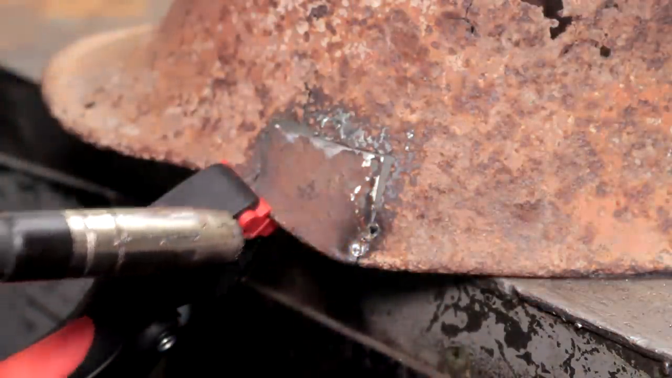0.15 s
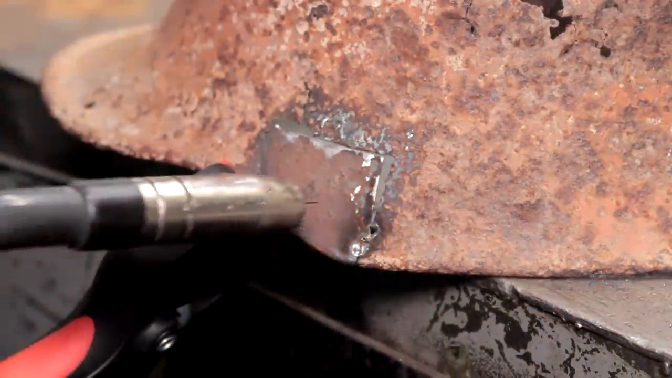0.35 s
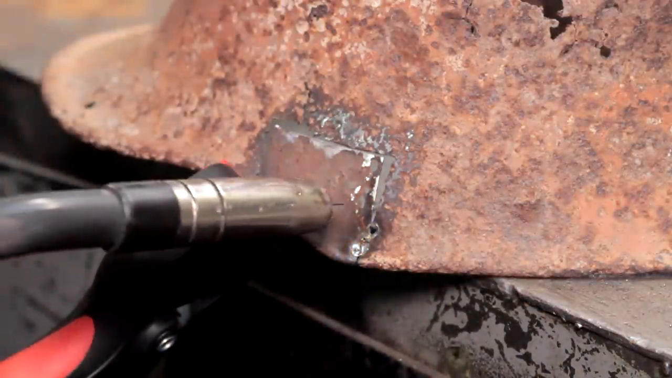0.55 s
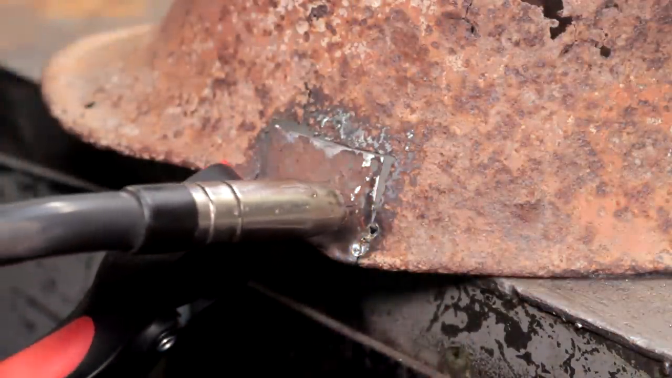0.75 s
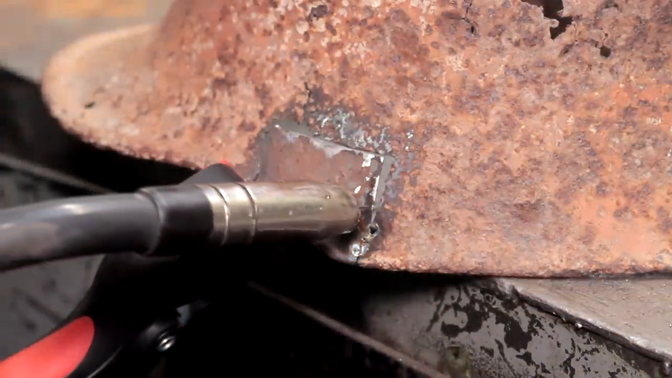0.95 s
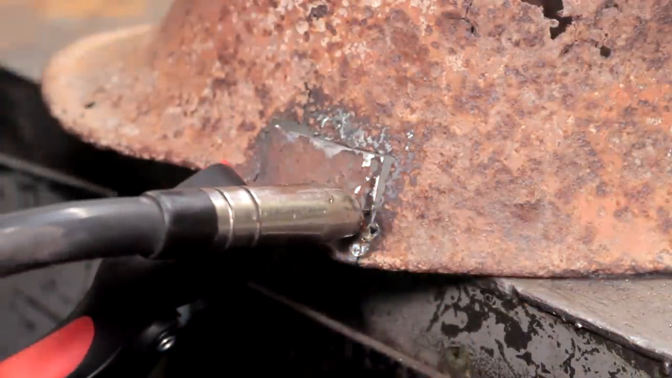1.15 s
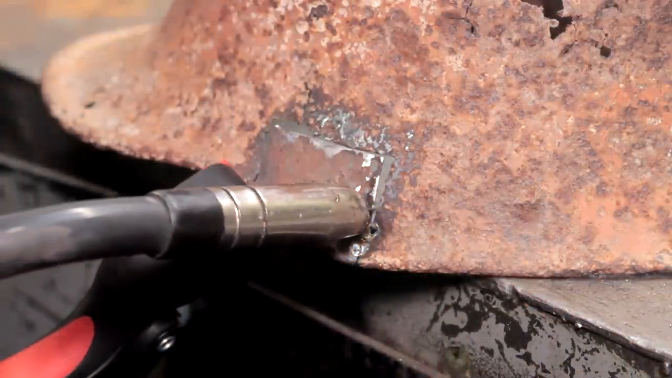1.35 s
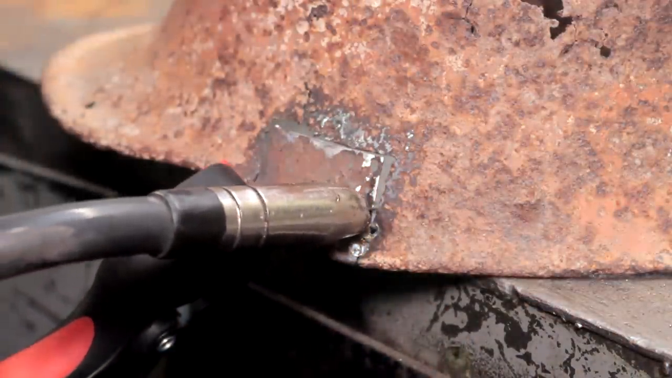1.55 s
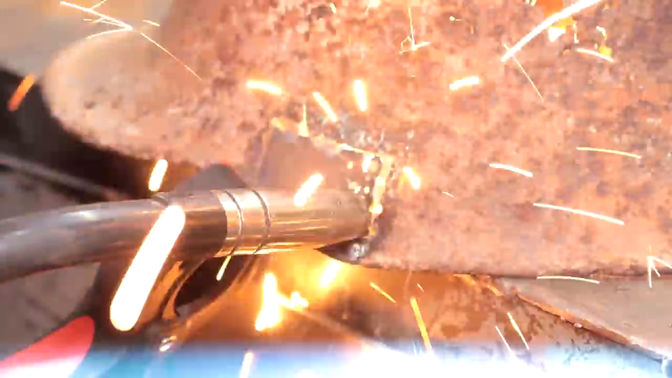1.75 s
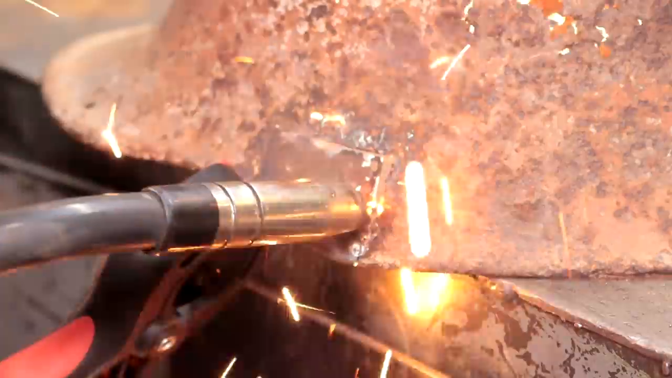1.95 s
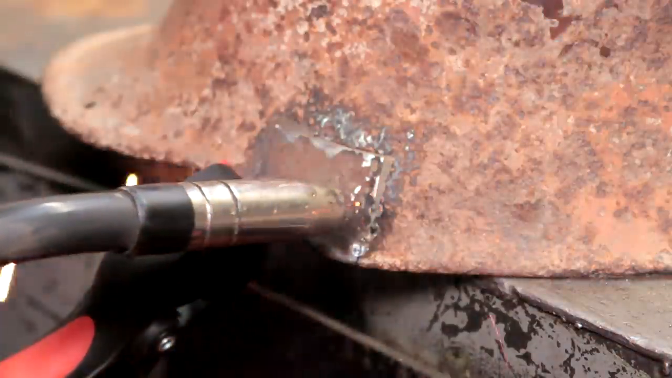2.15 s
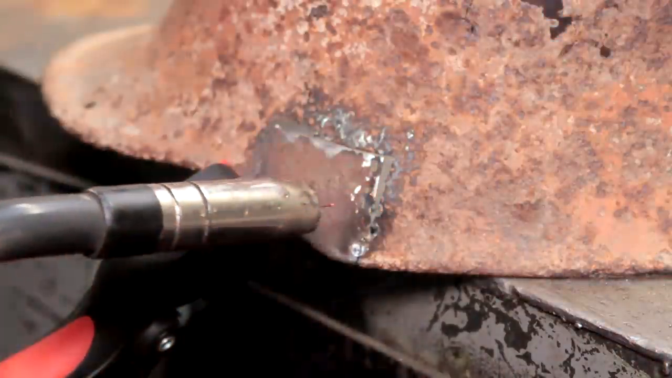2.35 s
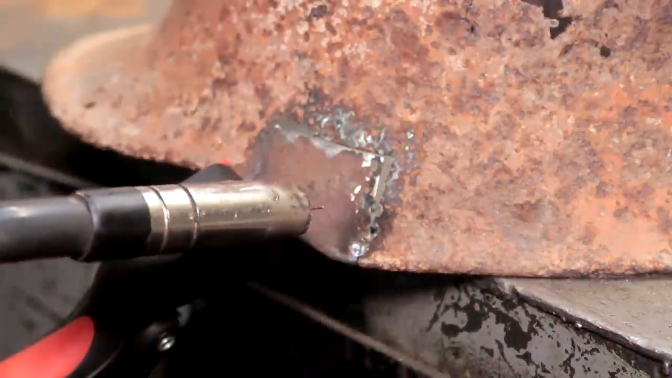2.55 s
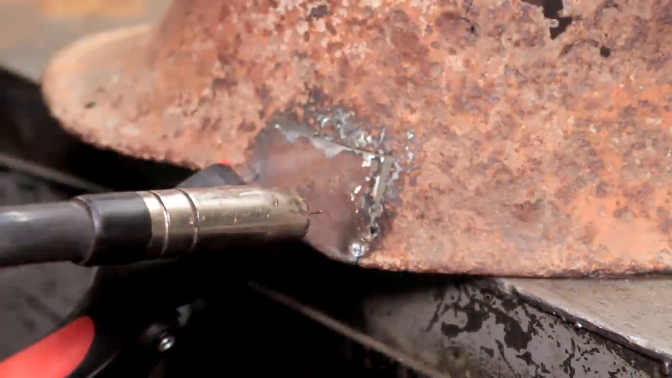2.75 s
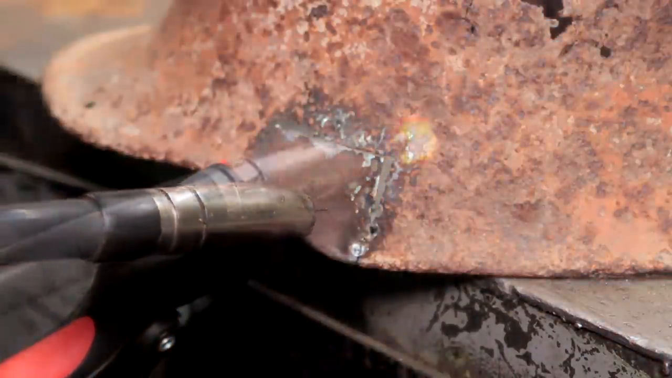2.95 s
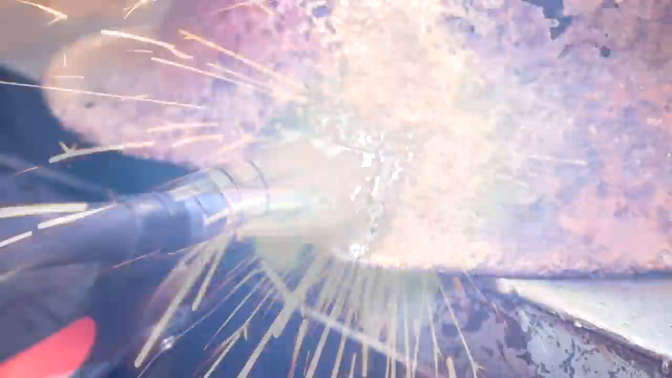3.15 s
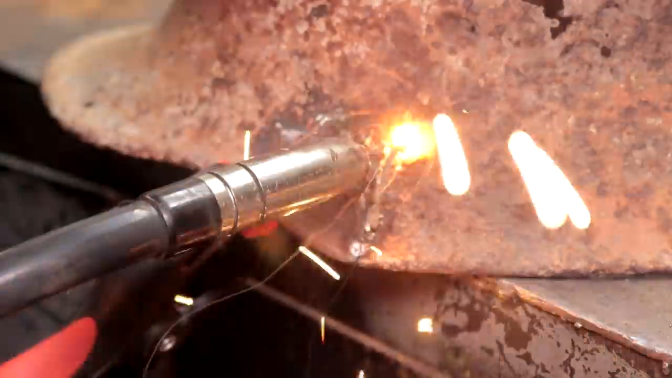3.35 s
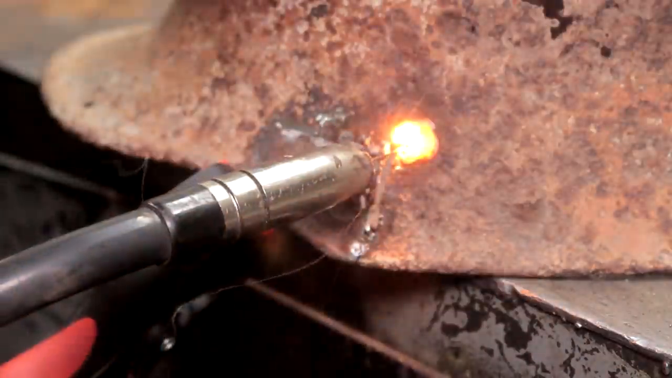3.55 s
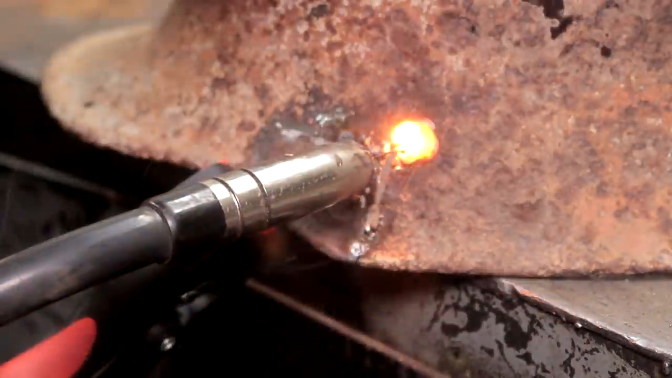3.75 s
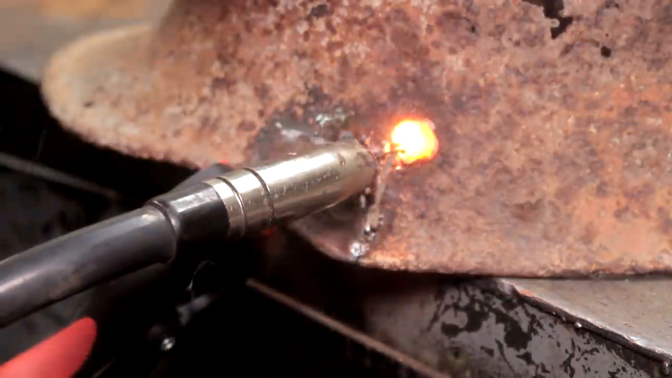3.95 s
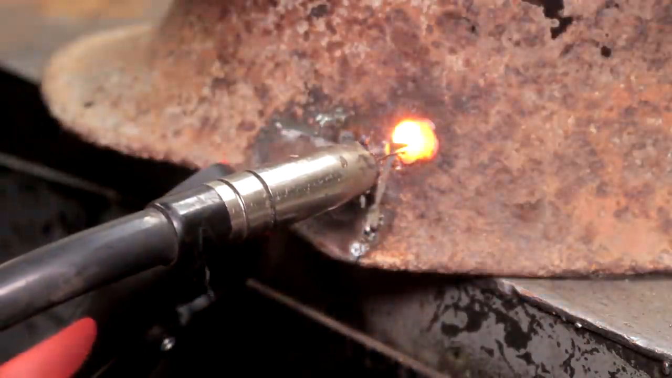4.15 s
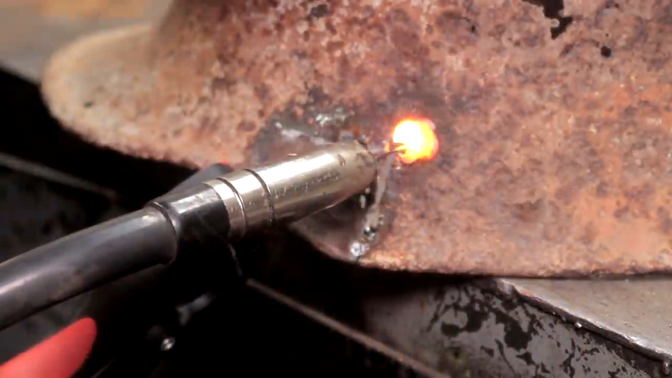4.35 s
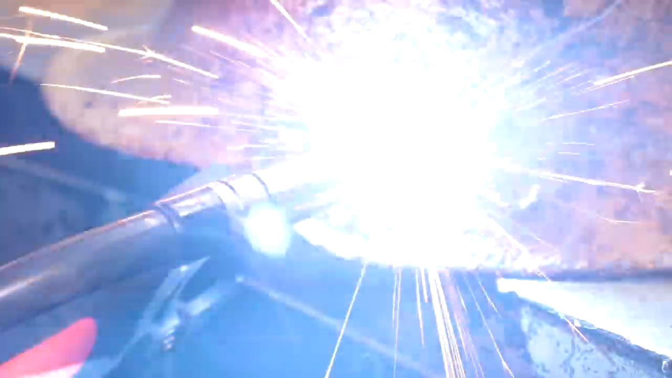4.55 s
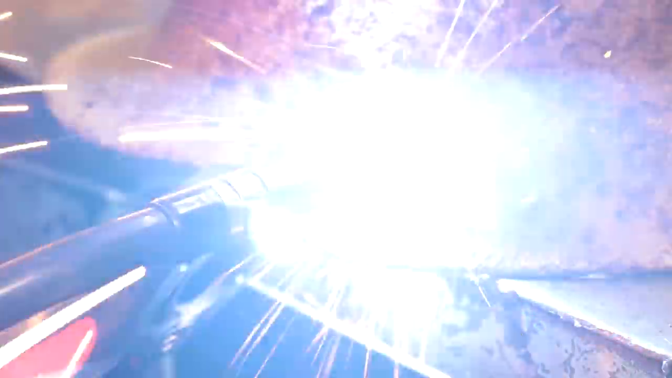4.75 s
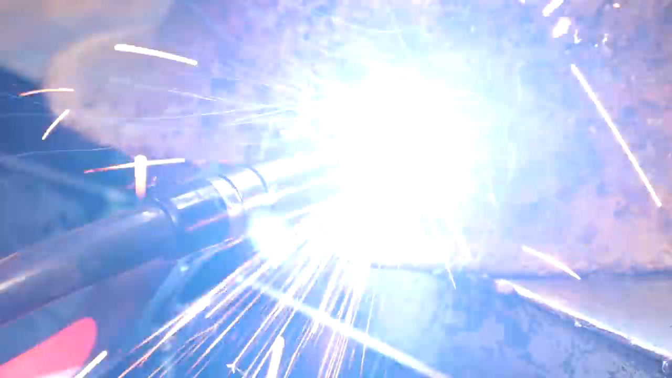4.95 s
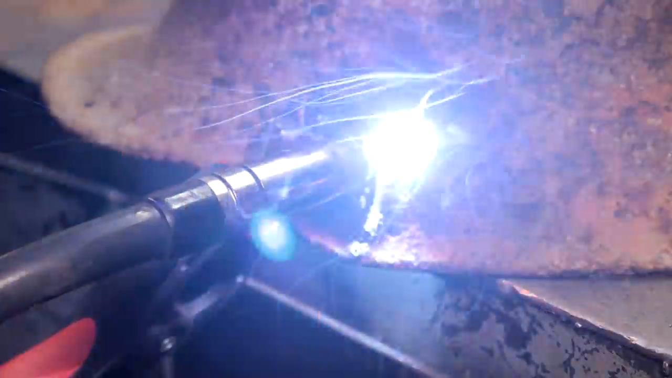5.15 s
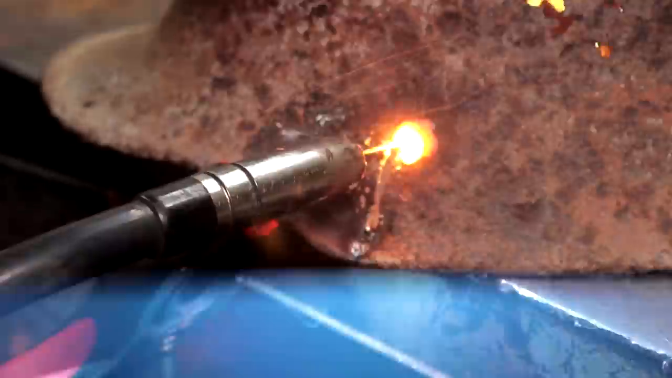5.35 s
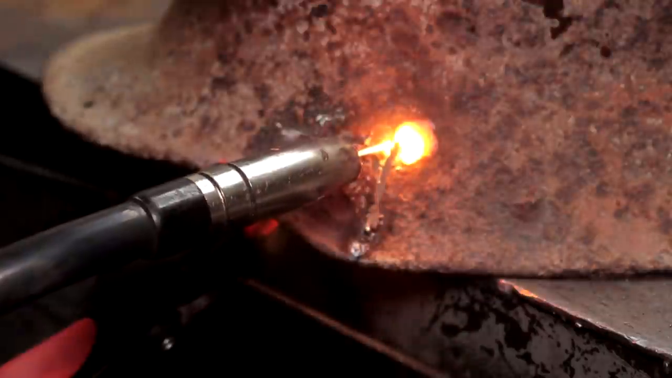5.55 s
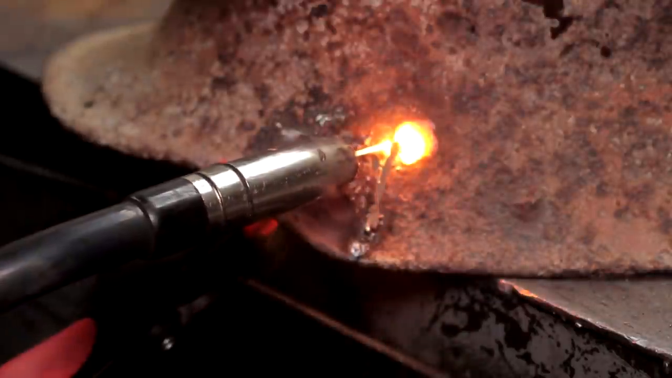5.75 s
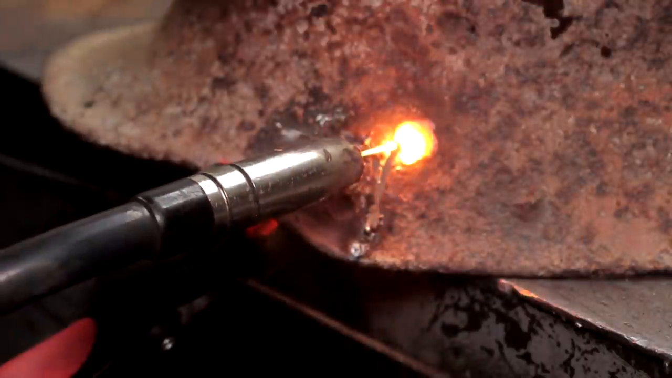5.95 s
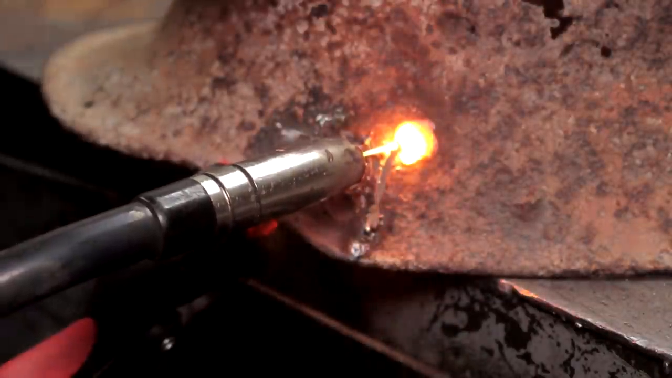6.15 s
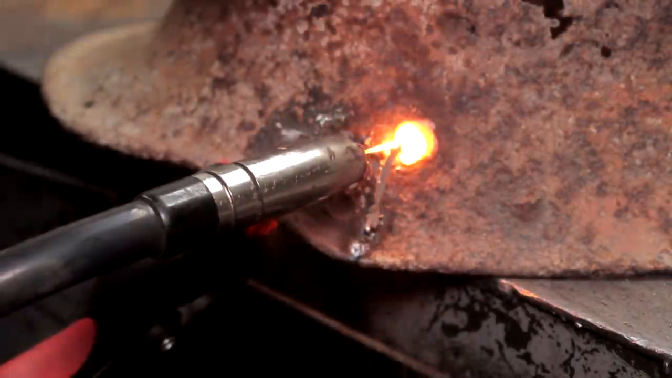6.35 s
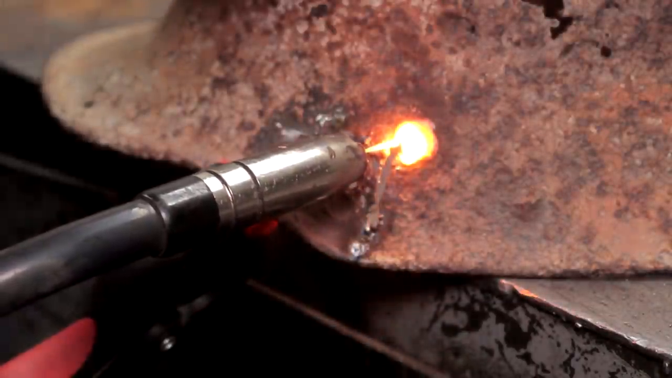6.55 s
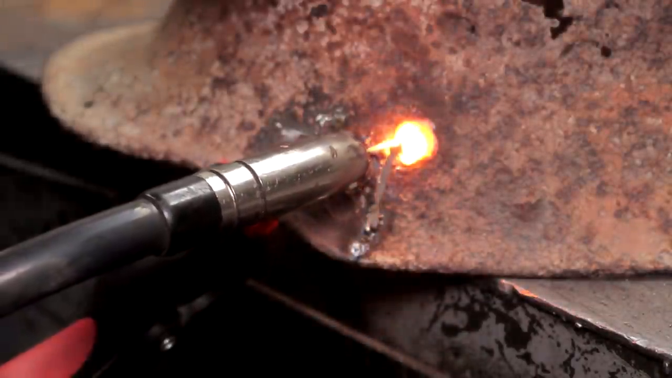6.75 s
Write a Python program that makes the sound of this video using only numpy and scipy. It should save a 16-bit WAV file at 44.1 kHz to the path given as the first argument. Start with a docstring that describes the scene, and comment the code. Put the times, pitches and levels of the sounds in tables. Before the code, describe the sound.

Three brief tack welds snap and sputter close by in a workshop, over the quiet hum of the welder's cooling fan.

```python
"""Tack welding a steel helmet

Three MIG tack welds, heard in stereo from close by in a workshop. A valve clicks and shielding gas
hisses; the wire short-circuits and bursts in sharp pops that ring in the steel and the room.
The hardest pops jolt the microphone into a low thump. The welder's cooling fan hums throughout."""
import sys
import numpy as np
from scipy import signal
from scipy.fft import rfft, irfft
from scipy.io import wavfile

SR = 44100
rng = np.random.default_rng(int(sys.argv[2]) if len(sys.argv) > 2 else 0)


def generate_wav(sig):
    """Save sig (samples, or channels by samples) to the path in sys.argv[1] as 16-bit PCM at SR."""
    pcm = np.round(np.clip(np.atleast_2d(sig).T, -1, 1) * 32767).astype(np.int16)
    wavfile.write(sys.argv[1], SR, pcm)


N = 299880
TIME = np.arange(N) / SR

# peaks and dips that close reflections give the pops: centre_hz, width_hz, gain_db
REFLECTION_COMB = [(1200, 200, 7), (2780, 200, 3.5), (3590, 250, -2.5), (4100, 220, 4.5), (5640, 250, 3),
                   (6775, 280, 5), (7650, 200, 5.5), (8220, 280, 2.5), (8900, 470, 0.5), (10890, 400, 2.5),
                   (11480, 310, -1), (12750, 290, 3), (13900, 600, 7.5), (14620, 380, 4.5),
                   (15590, 450, 5.5)]
# directivity of the arc: frequency_hz, left_minus_right_db
ARC_BALANCE = [(100, -0.5), (1000, 1), (3000, -1.5), (6000, 0), (9000, -1), (12000, -3), (14000, -9.5),
               (16000, -8)]
# each tack faces the microphone differently: start_s, end_s, treble_db, body_hz, body_db, push_length_s
TACK_WELDS = [(1.0, 2.6, -3, 1030, 4.5, .00068), (2.6, 4.2, -0.5, 1598, 2.5, .00095),
              (4.2, 6.2, 0.5, 1344, 2.5, .00047)]
# span over which the hum changes colour: start_s, end_s
HUM_CHANGE = (2.9, 3.6)


def arc(bursts, body_width_hz=260):
    """Directional radiation: each tack's position gives its cracks and ringing their own colour."""
    crackle, out = cracks(bursts) + steel_ring(bursts), np.zeros((2, N))
    for start, end, treble_db, body_hz, body_db, _ in TACK_WELDS:
        tack = crackle[:, round(start * SR):round(end * SR)]
        add(out, start, colour(tack, [(8000, 0), (13000, treble_db)], [(body_hz, body_width_hz, body_db)]))
    return out


def wire_bursts():
    """Relaxation oscillation: between loud pops, the fed wire shorts and bursts at a nearly even rate."""
    # loud pops: start_s, crack_db, ring_db, air_push (negative is suction on the right)
    pops = [(1.6334, -6.5, -29, 0), (1.6429, -4.5, -30, 2.5), (1.6545, -12.5, -27, .27),
            (1.675, -8.5, -22, -.13), (1.696, -23, -25.5, .23), (1.826, -23, -32.5, .03),
            (1.8536, -23.5, -25, 0), (1.868, -23, -33, 0), (1.9276, -24.5, -29.5, 0),
            (1.9428, -18, -27, .33), (3.0617, -19, -38.5, 0), (3.1748, -28, -38.5, .4),
            (3.1883, -23, -39.5, .48), (3.2015, -20, -38, 0), (3.2146, -12, -38, .22),
            (3.2273, -13, -33.5, -.68), (3.2407, -21, -35, .63), (3.2566, -18, -33, -.5),
            (3.2692, -21, -29.5, -.15), (3.2856, -16.5, -27.5, .26), (3.3003, -17, -32.5, .27),
            (3.3178, -23, -27, .38), (3.3427, -22.5, -36.5, 0), (4.5576, -34, -43, 0),
            (4.6117, -14.5, -31, 1.5), (4.6238, -18, -29.5, .13), (4.6856, -19, -32, -.4),
            (4.6985, -21, -34, .37), (4.7128, -12, -30.5, -.17), (4.7264, -12, -26.5, .65),
            (4.743, -17.5, -28, -.26), (4.7719, -12, -26, 1.05), (4.8155, -9, -26.5, .5),
            (4.862, -19, -26, -.56), (4.8849, -18, -28, -.5), (5.0677, -22.5, -40, 0),
            (5.0877, -18.5, -38.5, .25), (5.1095, -11.5, -31.5, -.27), (5.1453, -22, -35, .23),
            (5.2444, -14.5, -28, 0), (5.2864, -23.5, -33, 0), (5.4232, -14, -28, .9)]
    # runs of small pops: start_s, end_s, first_crack_db, last_crack_db, air_push
    sputters = [(1.713, 1.736, -17, -27, .04), (3.14, 3.1625, -41, -35, 0), (4.6373, 4.6752, -21, -21, .11),
                (4.8922, 4.988, -19.5, -22, 0), (5.0087, 5.0247, -25, -27, 0),
                (5.3054, 5.3275, -22.5, -21, 0)]
    shorts_per_s, jitter_s, scatter_db, ring_offset_db = 93, .0005, 2, -11
    bursts = list(pops)
    for start, end, first_db, last_db, push in sputters:
        count = 1 + round((end - start) * shorts_per_s)
        lateness, strength = rng.standard_normal((count, 2)).T
        times = np.linspace(start, end, count) + jitter_s * lateness
        db = np.linspace(first_db, last_db, count) + scatter_db * strength
        bursts += zip(times, db, db + ring_offset_db, push * amp(scatter_db * strength))
    return bursts


def cracks(bursts, decay_s=0.000092, grit=0.49, size=400, onset_samples=27):
    """Impulsive source: each burst is a gritty pressure spike, reflected by the helmet and bench."""
    # spectrum of a crack: frequency_hz, gain_db
    crack_spectrum = [(100, -5), (500, -3), (1100, -1), (1900, -4), (3400, 0), (4500, -3.5), (7000, -2.5),
                      (10000, -1), (14000, -4), (16000, -1.5)]
    # early reflections: delay_s, left_db, right_db
    reflections = [(.00112, -29, -16), (.0023, -20, -21), (.0048, -19, -14.5)]
    out, t = np.zeros((2, N)), np.arange(size) / SR
    for start, db, _, _ in bursts:
        left, right, shared = rng.standard_normal((3, size))
        spike = grit * (.5 * np.array([left, right]) + shared) * np.exp(-t / decay_s)
        spike[:, 0] = -1
        spike *= amp(db) / np.sqrt(np.mean(spike[:, :onset_samples] ** 2))
        add(out, start, spike)
        for delay, left_db, right_db in reflections:
            add(out, start + delay, spike * amp([[left_db], [right_db]]))
    return colour(out, crack_spectrum, REFLECTION_COMB, ARC_BALANCE)


def steel_ring(bursts, fast_t60_s=0.011, slow_t60_s=0.092, slow_db=-7, common=.7, grain=0.31):
    """Free decay: the steel rings like fading noise, a quick clatter and then a shimmer."""
    # spectrum of the ringing steel: frequency_hz, gain_db
    ring_spectrum = [(100, -9.5), (300, -6), (700, -4), (1200, -3.5), (1900, -1.5), (3500, 0), (4500, 1),
                     (7000, 1.5), (10000, 3.5), (12000, 1.5), (14000, -2), (16000, -6.5)]
    size, onset_samples = 6000, 330
    out, t = np.zeros((2, N)), np.arange(size) / SR
    decay = np.hypot(amp(-60 * t / fast_t60_s), amp(slow_db - 60 * t / slow_t60_s))
    for start, _, db, _ in bursts:
        left, right, shared, roughness = rng.standard_normal((4, size))
        ring = (np.array([left, right]) + common * shared) * decay * np.exp(grain * roughness)
        add(out, start + .0003, amp(db) * ring / np.sqrt(np.mean(ring[:, :onset_samples] ** 2)))
    return colour(out, ring_spectrum, REFLECTION_COMB, ARC_BALANCE)


def thumps(bursts, rise_s=.00004, gain_db=.3, stretch_power=.12, hollow_stretch=1.5):
    """Capsule overload: a one-way air pulse saturates the right side; the left gets a slower share."""
    # damped modes of a hollow knock: pitch_hz, level_db, t60_s
    knock_modes = [(560, 0, .011), (1400, -2.5, .009)]
    # the moment when the pops sound hollow: start_s, end_s
    hollow_span = (4.8, 4.9)
    left_share, left_delay_s, left_stretch = .36, .0001, 1.3
    out, t = np.zeros((2, N)), np.arange(600) / SR
    knock = sum(amp(db - 60 * t / t60) * np.sin(2 * np.pi * hz * t) for hz, db, t60 in knock_modes)
    for start, end, *_, push_length_s in TACK_WELDS:
        for pop_s, _, _, push in bursts:
            if start <= pop_s < end and push:
                hollow = hollow_span[0] < pop_s < hollow_span[1]
                length_s = push_length_s * abs(push) ** stretch_power * (hollow_stretch if hollow else 1)
                fall = np.exp(-(t / (length_s * np.array([[left_stretch], [1]]))) ** 2)
                left, right = (1 - np.exp(-t / rise_s)) * fall + hollow * knock
                add(out[:1], pop_s + left_delay_s, left_share * abs(push) * left)
                add(out[1:], pop_s, np.tanh(push) * right)
    return amp(gain_db) * out


def torch(click_t60_s=0.09, tick_t60_s=0.027, close_s=0.022, surge=0.76, surge_s=0.3, size=8000):
    """Impact and jet noise: the valve clicks open, gas hisses, the valve knocks shut; spatter lands."""
    # trigger pulls: open_s, shut_s, open_db, shut_db, gas_db
    trigger_pulls = [(1.520, 2.150, -45, -64, -61), (2.973, 3.609, -48, -51, -62),
                     (4.370, 5.702, -48, -53.5, -62), (6.764, 6.995, -44.5, -57, -62)]
    # a bead of spatter landing: start_s, level_db
    spatter = [(2.2844, -60.5)]
    # spectra of the opening click, the duller shutting knock and the gas jet: frequency_hz, gain_db
    click_spectrum = [(100, -5.5), (500, 2), (2000, 2.5), (2500, -2), (3200, 5), (4000, -14.5),
                      (6000, -7.5), (8000, 3.5), (10000, 0), (13500, 3.5), (16000, -6)]
    knock_spectrum = [(100, -10), (500, 16), (1000, 6), (1800, 15), (3500, -5), (8000, -16), (13000, -16),
                      (16000, -16)]
    gas_spectrum = [(100, -18.5), (400, -4.5), (1000, -7.5), (1500, 8), (2500, 3.5), (3600, -5),
                    (5200, -2.5), (7000, -3.5), (9500, -3.5), (12500, -9), (16000, -14)]
    # resonances of the nozzle: centre_hz, width_hz, gain_db
    nozzle_modes = [(1562, 150, 7), (5000, 400, 8), (8300, 500, 3.5), (12100, 500, 5.5), (13800, 500, 2.5)]
    clicks, knocks = np.zeros((2, 2, N))
    flow, t = np.zeros(N), np.arange(size) / SR
    for start, end, open_db, shut_db, gas_db in trigger_pulls:
        # pressure stored in the hose escapes first
        pressure = 1 + surge * np.exp(-abs(TIME - start) / surge_s)
        opening = np.interp(TIME, [start, start + .01, end, end + close_s], [0, 1, 1, 0])
        flow += amp(gas_db) * pressure * opening
        add(clicks, start, rng.standard_normal((2, size)) * amp(open_db - 60 * t / click_t60_s))
        add(knocks, end, rng.standard_normal((2, size)) * amp(shut_db - 60 * t / click_t60_s))
    for start, db in spatter:
        add(clicks, start, rng.standard_normal((2, size)) * amp(db - 60 * t / tick_t60_s))
    hiss = colour(flow * rng.standard_normal((2, N)), gas_spectrum, nozzle_modes)
    return colour(clicks, click_spectrum, nozzle_modes) + colour(knocks, knock_spectrum) + hiss


def workshop(x, build_s=.008):
    """Reverberation: a diffuse field builds quickly, lasts longest in the midrange and dies away."""
    # decay time of the room: frequency_hz, t60_s
    decay_times = [(200, 0.02), (1500, 0.96), (4000, 0.65), (8000, 0.55), (14000, 0.49)]
    # spectrum of the diffuse field: frequency_hz, gain_db
    room_spectrum = [(200, -4), (1500, -1), (5000, 4), (9000, 1), (15000, -1.5)]
    hz, t, noise = signal.stft(rng.standard_normal((2, SR)), SR, nperseg=256)
    tail = signal.istft(noise * amp(-60 * t / read(decay_times, hz)[:, None]), SR, nperseg=256)[1]
    tail *= 1 - np.exp(-np.arange(tail.shape[1]) / SR / build_s)
    tail /= np.linalg.norm(tail[0])
    return colour(signal.fftconvolve(x, tail, axes=1)[:, :N], room_spectrum)


def rotor_tone(ratio, levels, harmonics, lean_db, waver_hz=0.58, flutter_db=1.23):
    """Periodic excitation: an unsteady rotor's harmonics, each fluttering separately left and right."""
    # blade-passing frequency: time_s, pitch_hz
    blade_rate = [(0, 566.7), (2.7, 566.8), (3.2, 569.7), (3.9, 568.7), (6.8, 568.3)]
    # the level dips briefly: centre_s, half_width_s, gain_db
    level_dip = (2.99, .065, -11.5)
    dip_s, half_width_s, dip_db = level_dip
    cycles = np.cumsum(ratio * contour(blade_rate) + waver_hz * wander(11.5)) / SR
    db = contour(levels) + dip_db * np.exp(-((TIME - dip_s) / half_width_s) ** 2)
    partials = np.zeros((2, N))
    for multiple, *shift_db in harmonics:
        flutter = flutter_db * np.array([wander(4.2), wander(5)])
        gain = amp(np.interp(TIME, HUM_CHANGE, shift_db) + flutter)
        partials += gain * np.sin(2 * np.pi * multiple * cycles)
    return np.sqrt(2) * amp(db + lean_db * np.array([[.5], [-.5]])) * partials


def machine_hum(whine_ratio=2.2846, drone_drop_db=-2.5, whistle_hz=15390, whistle_db=-95):
    """Tonal machine noise: the fan's blade tone, a whine, casing drones and an electronic whistle."""
    # blade harmonics, whose colour shifts as the torch is moved: multiple, before_db, after_db
    harmonics = [(1, 0, 0), (2, -11, -13.5), (3, -24.5, -14), (4, -23, -22), (5, -26, -17.5),
                 (7, -30.5, -32.5), (8, -36.5, -29.5)]
    # strength of the blade tone and of the whine: time_s, level_db
    blade_levels = [(0, -58.5), (2.3, -58.4), (2.85, -55.5), (3.5, -56.8), (3.85, -62), (6.8, -61)]
    whine_levels = [(0, -68), (2.4, -66.5), (3.4, -63.5), (6.8, -63.7)]
    # narrow drones of the casing: pitch_hz, wander_hz, level_db
    casing_drones = [(325, 2.93, -68.5), (326.4, 10, -76), (343, 6, -90), (579, 16, -76)]
    drones = np.zeros(N)
    for hz, wander_hz, db in casing_drones:
        cycles = np.cumsum(hz + wander_hz * wander(23.9)) / SR
        drones += amp(db) * unit_rms(np.sin(2 * np.pi * cycles))
    # the low drones turn quieter as the bass thins
    drones *= amp(np.interp(TIME, HUM_CHANGE, [0, drone_drop_db]))
    blades = rotor_tone(1, blade_levels, harmonics, lean_db=1.0)
    whine = rotor_tone(whine_ratio, whine_levels, harmonics[:1], lean_db=8.5)
    whistle = amp(whistle_db) * unit_rms(np.sin(2 * np.pi * whistle_hz * TIME))
    return blades + whine + drones + whistle


def fan_air(rush_db=-64.5):
    """Turbulence: a steady broadband rush, alike on both sides in the bass. A low rumble lies beneath."""
    # spectra of the rush and of the rumble: frequency_hz, relative_density_db
    rush_spectrum = [(30, -27), (90, -22), (140, -17), (210, -8), (400, -2.5), (800, -2.5), (1500, -1.5),
                     (2200, -7), (4500, -10), (6500, -16), (9500, -25.5), (12500, -33), (16000, -44)]
    rumble_spectrum = [(30, -40.5), (90, -22), (130, -12), (170, -2), (230, -1.5), (350, 0), (500, -10.5),
                       (1000, -36.5), (4000, -71)]
    # likeness of the rush on the two sides: frequency_hz, correlation
    rush_correlation = [(100, .95), (640, 0.71), (1400, 0), (3000, .05), (16000, 0)]
    # low rumble fades in, drops and returns as the microphone's wind filter shifts: time_s, level_db
    passed_rumble = [(0, -90), (.8, -74), (3.66, -72), (3.69, -90), (6.2, -86), (6.8, -72)]
    hz = np.fft.rfftfreq(N, 1 / SR)
    left, independent, low = rfft(rng.standard_normal((3, N)))
    correlation = read(rush_correlation, hz)
    right = correlation * left + np.sqrt(1 - correlation ** 2) * independent
    rush = unit_rms(irfft(np.array([left, right]) * amp(read(rush_spectrum, hz)), N))
    rumble = unit_rms(irfft(low * amp(read(rumble_spectrum, hz)), N))
    return amp(rush_db) * rush + amp(contour(passed_rumble)) * rumble


def amp(db):
    """Decibels to amplitude ratio."""
    return 10 ** (np.asarray(db) / 20)


def unit_rms(x):
    """Normalisation to rms 1."""
    return x / np.sqrt(np.mean(x ** 2) + 1e-20)


def read(points, hz):
    """Interpolation of a spectrum on a log-frequency axis."""
    frequencies, values = np.transpose(points)
    return np.interp(np.log(hz + 1), np.log(frequencies + 1), values)


def contour(points):
    """Linear interpolation over time."""
    return np.interp(TIME, *np.transpose(points))


def add(mix, start_s, sound):
    """Superposition of a sound on the mix."""
    part = mix[:, max(round(start_s * SR), 0):][:, :sound.shape[-1]]
    part += sound[..., :part.shape[1]]


def colour(x, spectrum, peaks=(), balance=((1000, 0),), size=2048):
    """Minimum-phase filter of unit energy: a broad spectrum, peaks and dips, and a left-right lean."""
    hz = abs(np.fft.fftfreq(size, 1 / SR))
    peaks_db = sum(db / (1 + (2 * (hz - centre) / width) ** 2) for centre, width, db in peaks)
    gain = unit_rms(amp(read(spectrum, hz) + peaks_db + np.outer([.5, -.5], read(balance, hz))))
    taps = np.fft.ifft(np.exp(np.conj(signal.hilbert(np.log(gain))))).real
    return signal.oaconvolve(x, taps[:, :size // 2], axes=1)[:, :N]


def wander(hz, size=4096):
    """Random modulation: noise of rms 1, low-passed near hz."""
    step_s = N / SR / size
    low_pass = np.exp(-(np.fft.rfftfreq(size, step_s) / hz) ** 2)
    slow = irfft(rfft(rng.standard_normal(size)) * low_pass)
    return np.interp(TIME, np.arange(size) * step_s, unit_rms(slow))


def bass_cut(x, hz, q=0.74):
    """Second-order high-pass."""
    omega = 2 * np.pi * hz
    return signal.lfilter(*signal.bilinear([1, 0, 0], [1, omega / q, omega ** 2], SR), x)


def scene(reverb_db=-15.5):
    """Direct and diffuse sound: arc and torch close by, the workshop behind, the machine beneath."""
    bursts = wire_bursts()
    direct = arc(bursts) + torch()
    return direct + amp(reverb_db) * workshop(direct) + thumps(bursts) + fan_air() + machine_hum()


def record(dry, ceiling=0.39, band_limit_hz=16000):
    """Soft saturation flattens the loudest pops, after a bass cut and before a band limit."""
    # the bass cut steps up once: time_s, corner_before_hz, corner_after_hz
    corner_step = (3.67, 120, 255)
    step_s, before_hz, after_hz = corner_step
    crossfade = np.interp(TIME, [step_s, step_s + .01], [0, 1])
    thinned = (1 - crossfade) * bass_cut(dry, before_hz) + crossfade * bass_cut(dry, after_hz)
    saturated = thinned / (1 + (thinned / ceiling) ** 6) ** (1 / 6)
    low_pass = signal.firwin(255, band_limit_hz, window=("kaiser", 7), fs=SR)
    return signal.oaconvolve(saturated, low_pass[None], "same")


dry = scene()
out = record(dry)
generate_wav(out)
```